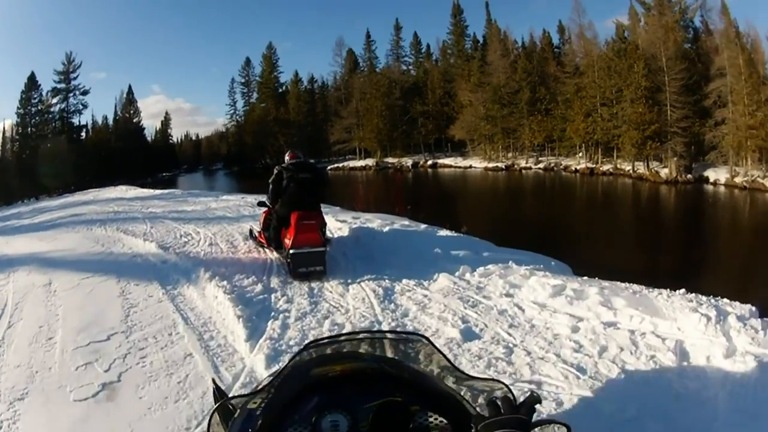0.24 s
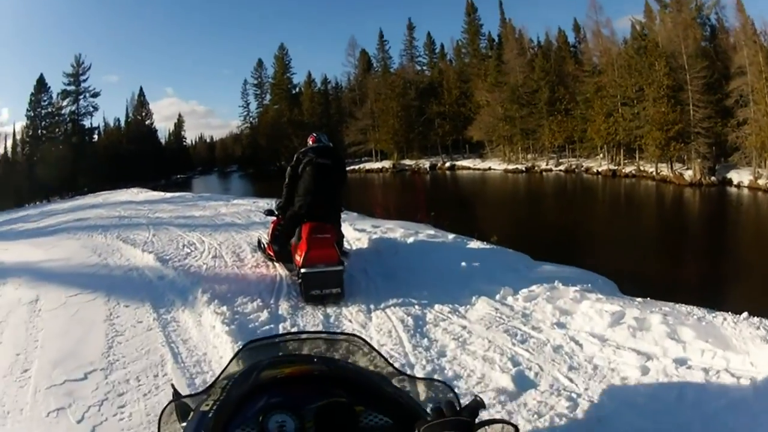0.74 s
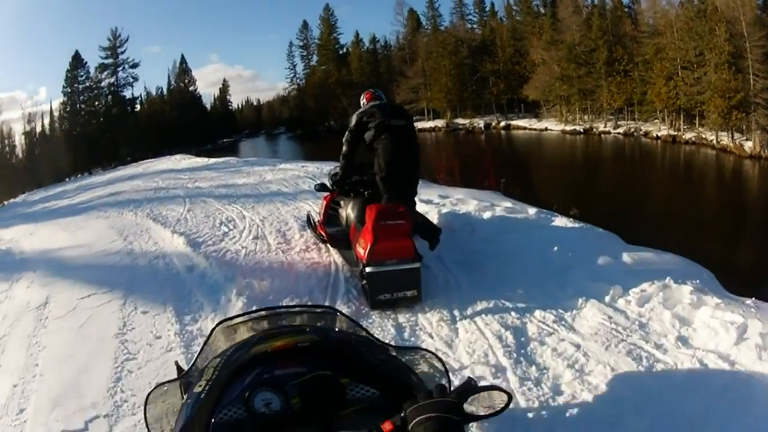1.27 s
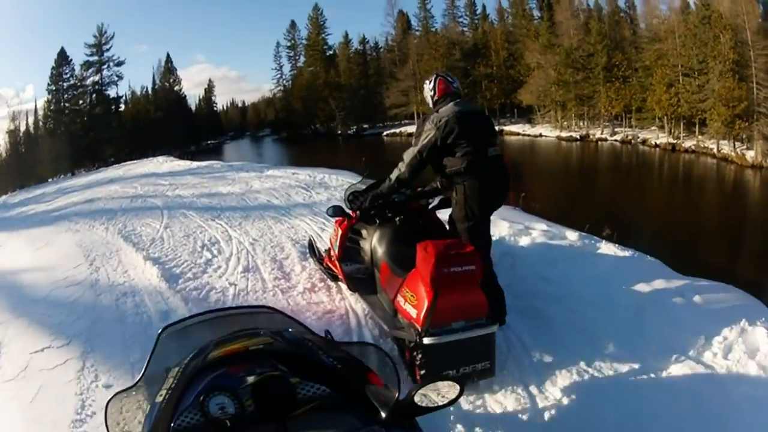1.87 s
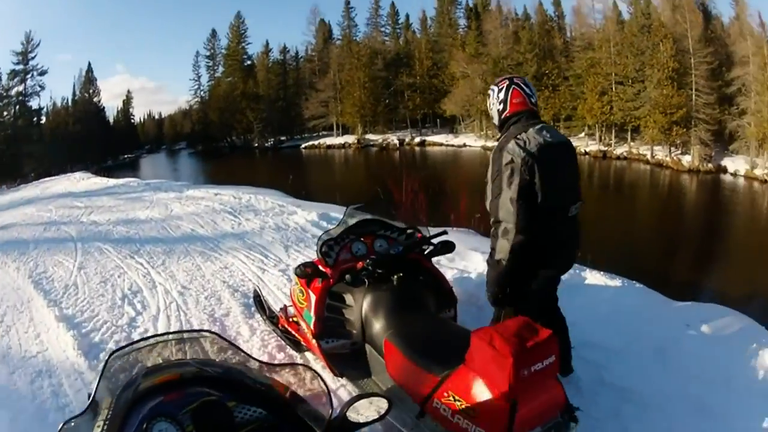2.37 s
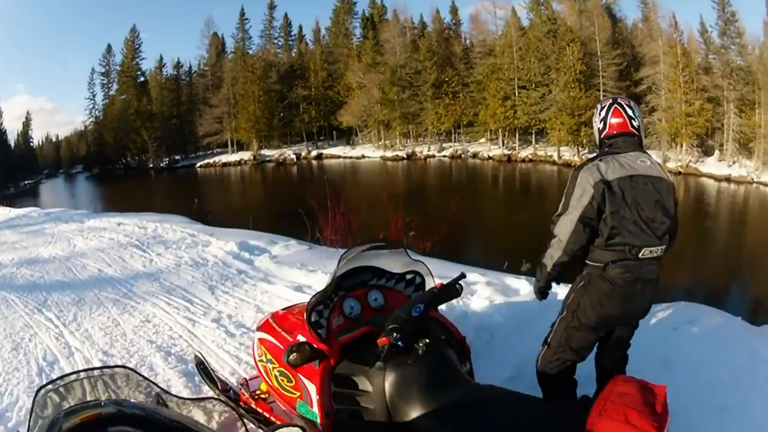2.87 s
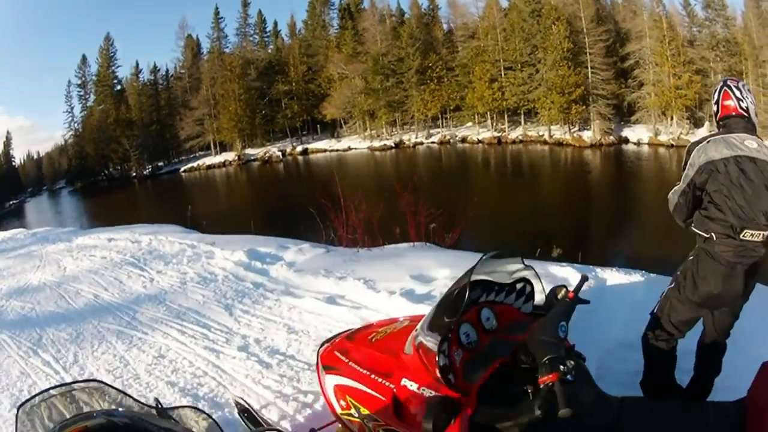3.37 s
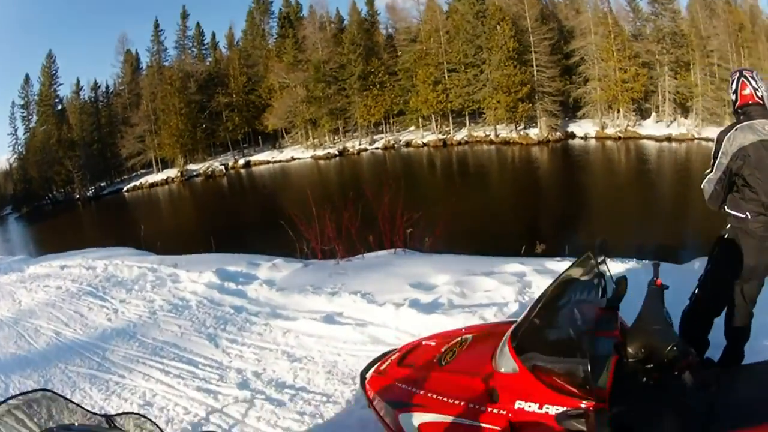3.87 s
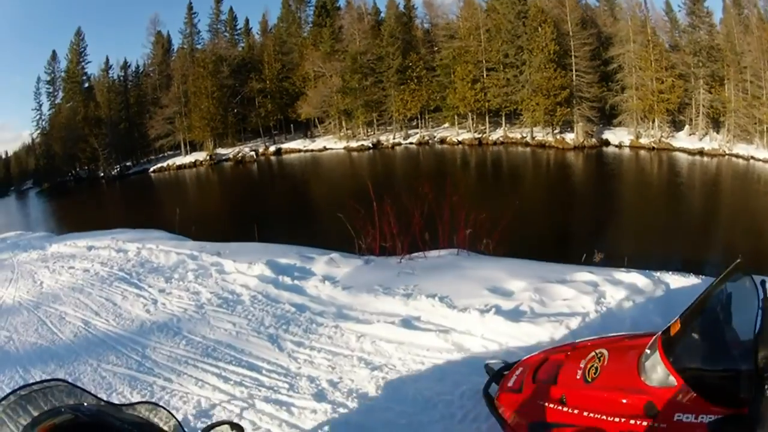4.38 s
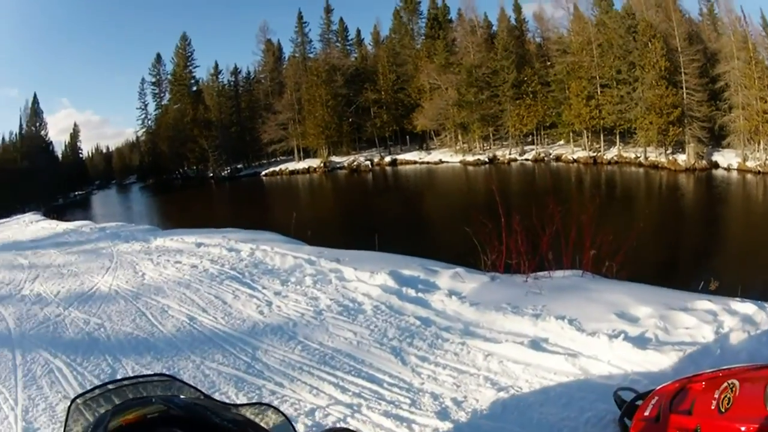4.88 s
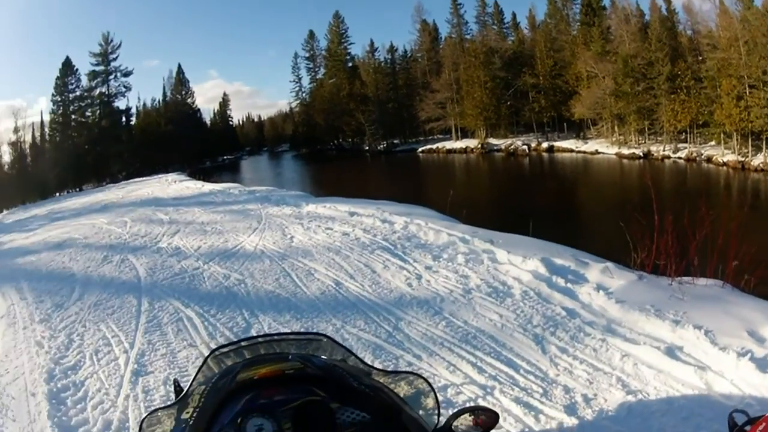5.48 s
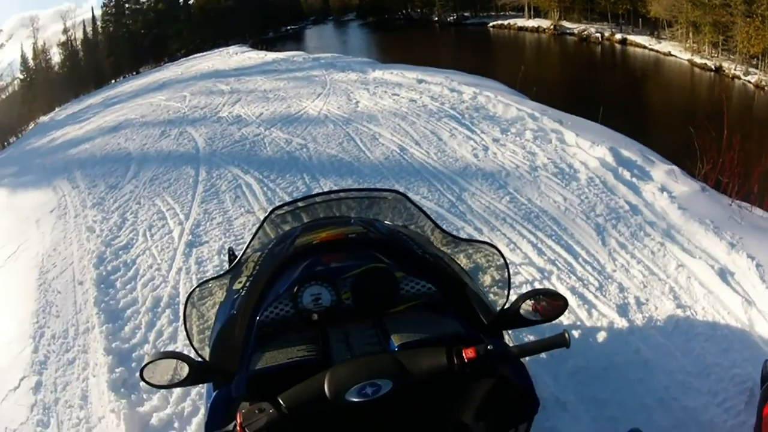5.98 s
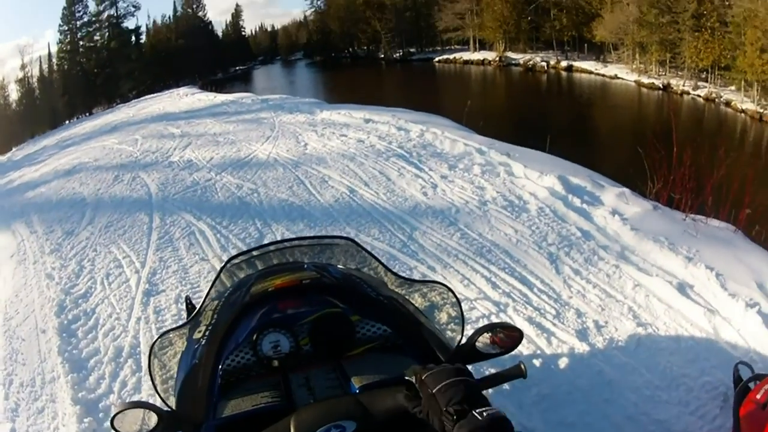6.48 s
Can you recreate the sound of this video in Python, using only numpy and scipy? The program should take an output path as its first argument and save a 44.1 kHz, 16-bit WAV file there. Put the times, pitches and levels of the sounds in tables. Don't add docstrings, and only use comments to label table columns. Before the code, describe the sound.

Lumpy two-stroke snowmobile idle with a low drone and clattering cowl, after two short throttle blips, captured close with crude low-fidelity grit.

```python
import sys
import numpy as np
from scipy import signal
from scipy.fft import rfft, irfft, next_fast_len
from scipy.io import wavfile
from scipy.ndimage import uniform_filter1d

SR = 44100
rng = np.random.default_rng(int(sys.argv[2]) if len(sys.argv) > 2 else 0)


def log_audio(samples):
    frames = np.atleast_2d(samples).T
    limited = np.clip(frames, -1, 1)
    pcm = np.round(limited * 32767).astype(np.int16)
    wavfile.write(sys.argv[1], SR, pcm)


def how_loud(loudness_db):
    steps = np.asarray(loudness_db, float) / 20
    return 10 ** steps


N = 297189
TIME = np.arange(N) / SR
IDLE_HZ, IDLE_DB = 116, -35


def rms_one(x):
    return x / np.sqrt(np.mean(x ** 2) + 1e-20)


def in_time(rows):
    s, *columns = np.transpose(rows)
    return [np.interp(TIME, s, column) for column in columns]


def drift(rate):
    r = np.exp(-80 * np.pi * rate / SR)
    chance = rng.standard_normal(N // 40 + 2002)
    slow = signal.lfilter([1], [1, -2 * r, r * r], chance)[2000:]
    return np.interp(np.arange(N) / 40, np.arange(len(slow)), rms_one(slow))


def swells(times, sizes, rise_s):
    kicks, r = np.zeros(N), np.exp(-1 / (rise_s * SR))
    kicks[np.clip((times * SR).astype(int), 0, N - 1)] = sizes
    return signal.lfilter([0, np.e * r / (rise_s * SR)], [1, -2 * r, r * r], kicks)


def coloured(x, spectrum):
    size = next_fast_len(N)
    hz = np.arange(size // 2 + 1) * SR / size + 1
    points, level_db = np.transpose(spectrum)
    gain = how_loud(np.interp(np.log(hz), np.log(points), level_db))
    return rms_one(irfft(rfft(x, size) * gain, size)[:N])


def resonate(x, modes):
    out = 0
    for k, (hz, width, level_db) in enumerate(modes):
        r = np.exp(-np.pi * width / SR)
        poles = [1, -2 * r * np.cos(2 * np.pi * hz / SR), r * r]
        out = out + (-1) ** k * how_loud(level_db) * signal.lfilter([1 - r, 0, r - 1], poles, x)
    return out


def band(x, low_hz, high_hz):
    return signal.sosfiltfilt(signal.butter(2, [low_hz, high_hz], "band", fs=SR, output="sos"), x)


# t/s, share of the full turn
HEAD_TURN = [(0.0, 0.077), (0.37, 0.56), (1.5, 0.23), (2.25, 0.29), (3.0, 0.67), (3.74, 0.65), (4.15, 0.99),
             (4.6, 0.8), (5.24, 0.33), (6.2, 0.25), (6.74, 0.29)]
# t/s, share of the track speed lost
COASTING = [
    (0.0, 0.21),
    (2.2, 0.03),
    (3.9, 0.34),
    (4.3, 0.84),
    (5.2, 0.95),
    (6.0, 0.69),
    (6.74, 0.7),
]


def level(law):
    idle_db, follows, turned_db, halted_db = law
    effort = follows * (in_time(RUNNING)[1] - IDLE_DB)
    return idle_db + effort + turned_db * in_time(HEAD_TURN)[0] + halted_db * in_time(COASTING)[0]


# t/s, lag of the drone [cycles], surge level/dB
CATCHES = [(0.066, 0.2, 0.5), (0.123, 0.21, 2.5), (0.253, 0.45, 4), (0.384, 0.26, 7),
           (0.513, 0.3, 3), (0.596, 0.27, 0.5), (1.177, 0.17, 2), (1.315, 0.16, 2),
           (1.427, 0.26, -1.5), (1.553, 0.28, -3.5), (1.687, 0.23, 0), (1.76, 0.19, 0),
           (2.151, 0.16, 2), (2.292, 0.067, -2.5), (2.516, 0.25, -2.5), (2.654, 0.33, -2),
           (2.762, 0.404, 3), (2.894, 0.34, 2), (3.026, 0.3, 4), (3.161, 0.3, 3.5),
           (3.3, 0.29, 2.5), (3.429, 0.19, 3), (3.56, 0.31, 3), (3.694, 0.28, 3.5),
           (3.82, 0.24, 0.5),
           (3.928, 0.14, 0), (4.02, 0.3, 2), (4.149, 0.34, 1), (4.269, 0.32, 1),
                    (4.322, 0.22, 1.5), (4.383, 0.501, 1), (4.511, 0.38, 2), (4.649, 0.33, 0.5),
                    (4.784, 0.26, 1), (4.892, 0.16, -1), (5.021, 0.24, -1), (5.099, 0.28, 0.5),
                    (5.16, 0.26, 0), (5.232, 0.42, 2), (5.371, 0.32, 4), (5.499, 0.26, 2.5),
                    (5.702, 0.277, 2.5), (5.821, 0.38, 4), (5.959, 0.34, 5.5), (6.093, 0.27, 3.5),
                    (6.244, 0.23, 2.5), (6.347, 0.21, -0.5), (6.413, 0.36, 4.5), (6.54, 0.36, 5.5)]


def catches():
    return np.transpose(CATCHES)


# t/s, drone f/Hz, drone level/dB
RUNNING = [(0.0, 121.6, -31), (0.46, 119.5, -33.5), (0.66, 121.4, -30), (0.8, 128.6, -25),
           (1.0, 132.8, -26.5), (1.13, 130.2, -30), (1.39, 120.3, -32.5), (1.65, 117.2, -30),
           (1.89, 129.4, -26.5), (2.08, 128.8, -29), (2.32, 118.8, -32.5), (3.1, 116.1, -36.5),
           (3.95, 115.8, -36), (4.42, 117.4, -33), (5.0, 115.0, -34.5), (5.9, 115.1, -33.5),
           (6.5, 115.5, -33.5), (6.74, 111.5, -32)]


def exhaust_drone():
    drone_hz, drone_db = in_time(RUNNING)
    at, lag, surge_db = catches()
    coarse = np.arange(0, N + 50, 50) / SR
    taken = .5 + .5 * np.tanh((coarse[:, None] - at) / .012)
    blend = np.prod(1 - taken + taken * np.exp(-2j * np.pi * lag), axis=1)
    blend = np.interp(TIME, coarse, blend)
    idling = np.clip((131 - drone_hz) / 8, .15, 1)
    surge = swells(at + 0.0102, surge_db + 1.5, rise_s=0.015)
    surge += swells(at + .065, 0.89, rise_s=0.045)
    spurt_hz = swells(at + .03, 9 * lag, rise_s=.025)
    turning_hz = drone_hz - 1.2 * idling + spurt_hz + 0.2626 * drift(6.034)
    angle = 2 * np.pi * np.cumsum(turning_hz) / SR
    loudness = how_loud(drone_db + surge + 0.26 * idling * drift(14.3))
    wave = np.exp(1j * (angle + 0.22 * idling * drift(10.6)))
    lost = uniform_filter1d(taken @ lag, size=130, mode="nearest")
    crank = angle / 2 - np.pi * np.interp(TIME, coarse, lost)
    return loudness * np.real(blend * wave), crank, surge


# crank multiple, level/dB
ORDERS = [(1, -59), (3, -72.5), (5, -71), (6, -76), (7, -75), (10, -71), (11, -76), (12, -80), (14, -73.5)]
# idle level/dB, dB per dB of drone, dB at full head turn, dB at a halt
DOUBLED_LEVEL = (-65, 1.1, 4.5, -0.7)


def crank_orders(crank, surge):
    effort_db = 0.36 * (in_time(RUNNING)[1] - IDLE_DB) + 0.84 * surge
    crank_hz = np.gradient(uniform_filter1d(crank, size=4000)) * SR / (2 * np.pi)
    sing_hz, sing_width_hz, sing_db = 802, 13, 11
    out = how_loud(level(DOUBLED_LEVEL) - 2 + 2.5 * drift(3.9)) * np.cos(4 * crank)
    for k, order_db in ORDERS:
        singing_db = sing_db * np.exp(-((k * crank_hz - sing_hz) / sing_width_hz) ** 2)
        out += how_loud(order_db + effort_db + singing_db + 2.9 * drift(2.9)) * np.cos(k * crank + k)
    return out


def rocking_block(crank):
    at, lag, surge_db = catches()
    rock_db = -37.5 - 28 * lag - 0.5 * surge_db
    rocking = swells(at - .015, how_loud(rock_db - 2.5), rise_s=0.012)
    rocking -= swells(at + 0.051, how_loud(rock_db - 7.5), rise_s=0.014)
    return rocking * np.cos(crank)


# t/s, level/dB
NEIGHBOUR = [
    (0.0, 11),
    (1.2, -6),
    (2.5, 1.5),
    (3.4, -3),
    (3.9, 1.5),
    (5.1, -2.5),
    (5.5, -0.5),
    (6.74, -6),
]


def pipe_thumps():
    at, _, surge_db = catches()
    drone_hz = in_time(RUNNING)[0][(at * SR).astype(int)]
    thump_db = -36.5 - surge_db - 2.5 * (drone_hz - IDLE_HZ)
    angle = 2 * np.pi * np.cumsum(162.6 + 1.453 * drift(1.56)) / SR
    hum = how_loud(-74 + 2 * drift(2.2))
    thumps = swells(at - .018, how_loud(thump_db - 10.5), rise_s=0.032)
    return (hum + thumps) * how_loud(in_time(NEIGHBOUR)[0]) * np.cos(angle)


def knocks(crank, jitter_s):
    at = np.flatnonzero(np.diff(np.floor(crank / (2 * np.pi))) > 0)
    chance = rng.standard_normal((500, 2))[:len(at)]
    out = np.zeros(N)
    late = (jitter_s * SR * chance[:, 0]).astype(int)
    out[np.clip(at + late, 0, N - 1)] = how_loud(0.98 * chance[:, 1])
    cascade = rng.standard_normal(600) * np.exp(-np.arange(600) / 150)
    return rms_one(signal.fftconvolve(out, cascade)[:N])


# t/s, peak level/dB
CLATTERS = [(0.2825, -37), (0.402, -21), (0.5511, -37), (1.4088, -27), (1.565, -35), (1.906, -25),
            (2.33, -34), (2.5212, -28), (3.35, -37), (3.7477, -30.5), (3.899, -26), (4.419, -35),
            (4.56, -22), (4.698, -26), (5.537, -28), (6.136, -26.5), (6.297, -27), (6.6081, -30)]


def shaking(crank):
    at, lag, surge_db = catches()
    jolt_db = 1.17 - lag + 0.25 * surge_db
    throb = how_loud(swells(at + .02, jolt_db, rise_s=.02) + .4 * drift(12))
    pulse = 1 + .13 * np.cos(crank) + .06 * np.cos(2 * crank)
    roar = pulse * how_loud(0.15 * drift(22)) * rng.standard_normal((3, N))
    hit_s, hit_db = np.transpose(CLATTERS)
    above_db = hit_db - np.interp(hit_s, TIME, level(RATTLE_LEVEL))
    roar *= 1 + swells(hit_s - .004, how_loud(above_db - 17), rise_s=.006)
    firing = np.clip((in_time(RUNNING)[0] - 121) / 10, 0, 1)
    knock_db = np.array([[-8.5], [-13.], [-8.5]]) + 8 * firing
    return throb * (roar + knocks(crank, jitter_s=.00003) * how_loud(knock_db)), throb


# f/Hz, level/dB per Hz
RATTLE = [(530, -76), (900, -13), (1120, -9), (1210, -3.5), (1280, 2.5), (1480, 1.5), (1630, 2), (1850, 2),
          (2040, 5.5), (2860, -13.5), (3430, -10.5), (3760, -17), (3950, -72), (5140, -101), (8690, -120)]
# f/Hz, width [Hz], level/dB
COWL = [(1241.4, 28.4, -2), (1353.5, 23.6, 0.5), (1583, 24, -2), (1694, 28.4, -0.5), (2027, 9.5, 0.5),
        (2230, 69, -5.5), (2517, 77, -17), (2773, 91, -13)]
# idle level/dB, dB per dB of drone, dB at full head turn, dB at a halt
RATTLE_LEVEL = (-42.5, 0.3449, 4, -0.2)
LOW_COWL, MIDDLE_COWL, TOP_SHELF = (-4, -0.16, -8, 2), (-4, 0.36, -4, -1), (-3.5, 0.01, -14.5, -0.6)


def cowl_rattle(shake):
    cowl = how_loud(-0.5) * rms_one(resonate(shake[0], COWL)) + coloured(shake[1], RATTLE)
    for gain_db, low_hz, high_hz in ((level(LOW_COWL) + 5.5, 1150, 1440),
                                     (level(MIDDLE_COWL) + 6.0, 1480, 1820),
                                     (level(TOP_SHELF) + 13, 2330, 3200)):
        cowl = cowl + (how_loud(gain_db) - 1) * band(cowl, low_hz, high_hz)
    return how_loud(level(RATTLE_LEVEL) + 1.5) * rms_one(cowl)


# f/Hz, width [Hz], level/dB
CASE = [(544, 10.3, 0), (663.5, 86, 2), (796, 94, 3), (992, 70, -1)]
# idle level/dB, dB per dB of drone, dB at full head turn, dB at a halt
CASE_LEVEL = (-57, 0.5, -1.0, -3.5)


def case_ring(shake, throb):
    ring = rms_one(resonate(resonate(shake[2], CASE), CASE))
    return how_loud(level(CASE_LEVEL) + 1.5) * throb ** 0.5 * ring


# f/Hz, level/dB per Hz
RUMBLE = [(20, -10), (45, -11.5), (90, 2), (150, 3), (200, -7), (300, -16), (500, -12.5), (900, -34.5),
          (1300, -33), (1800, -34)]
# idle level/dB, dB per dB of drone, dB at full head turn, dB at a halt
SHUDDER_LEVEL = (-60.5, 0.09, -0.2, -3.5)


def rumble():
    return how_loud(level(SHUDDER_LEVEL) + 13 + 1.44 * drift(8.8)) * coloured(rng.standard_normal(N), RUMBLE)


def scene():
    drone, crank, surge = exhaust_drone()
    tones = drone + crank_orders(crank, surge) + rocking_block(crank) + pipe_thumps()
    shake, throb = shaking(crank)
    mechanics = cowl_rattle(shake) + case_ring(shake, throb)
    return (np.sqrt(2) * tones + mechanics + rumble())[None]


def slow_sampling(dry):
    edge = signal.firwin(441 * 24 + 1, 0.92 / 441, window=("kaiser", 7.5))
    slow = signal.resample_poly(dry, 80, 441, axis=1, window=edge)
    held = np.repeat(slow, 6, axis=1)
    return signal.resample_poly(np.pad(held, ((0, 0), (0, 20))), 147, 160, axis=1)[:, :N]


# f/Hz, level/dB
FAINT = [(3400, -22), (4600, -22), (6800, -19), (7500, -15), (8500, -14), (9000, -19), (12000, -20),
         (15000, -18)]


def drop_faint(x):
    hz, _, tiles = signal.stft(x, SR, nperseg=2048, noverlap=1024)
    groups = np.arange(len(hz)) // 6
    power = np.add.reduceat(abs(tiles[0]) ** 2, np.arange(0, len(hz), 6), axis=0)
    loud_rows = groups[(hz > 5000) & (hz < 6500)]
    loud = uniform_filter1d(power[loud_rows].mean(axis=0), size=9)
    below_db = np.interp(hz[::6], *np.transpose(FAINT))[:, None]
    limit = loud * how_loud(2 * (below_db + 2.2 * rng.standard_normal(power.shape)))
    keep = (power > limit)[groups] | (hz < 3400)[:, None]
    return signal.istft(tiles * keep, SR, nperseg=2048, noverlap=1024)[1][:, :N]


def low_pass(x):
    return signal.sosfilt(signal.butter(12, 15290, fs=SR, output="sos"), x)


def record(dry):
    finished = drop_faint(slow_sampling(dry))
    return low_pass(finished)


dry = scene()
out = record(dry)
log_audio(out)
```